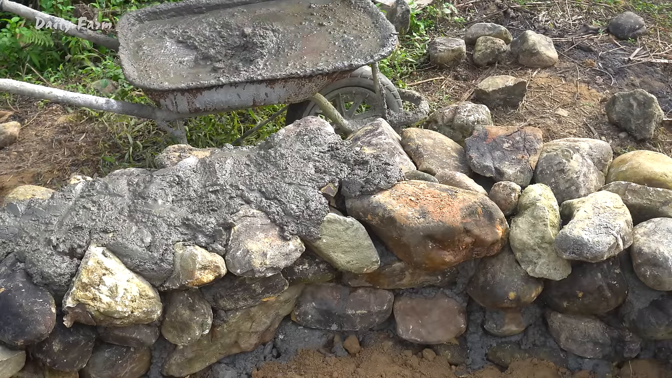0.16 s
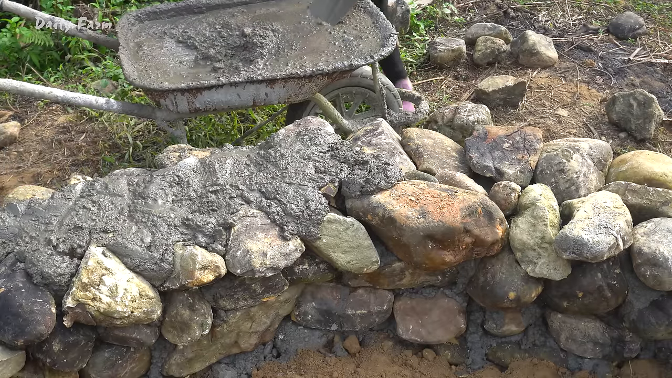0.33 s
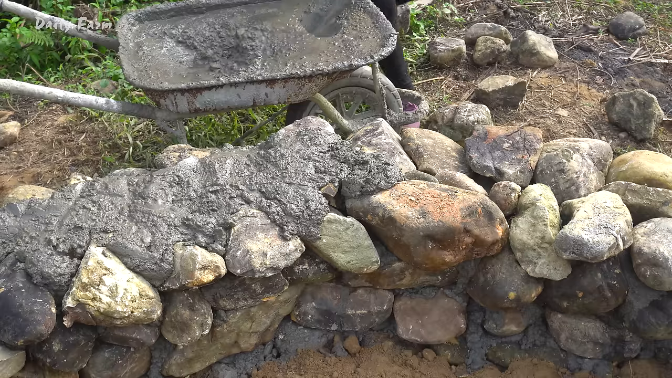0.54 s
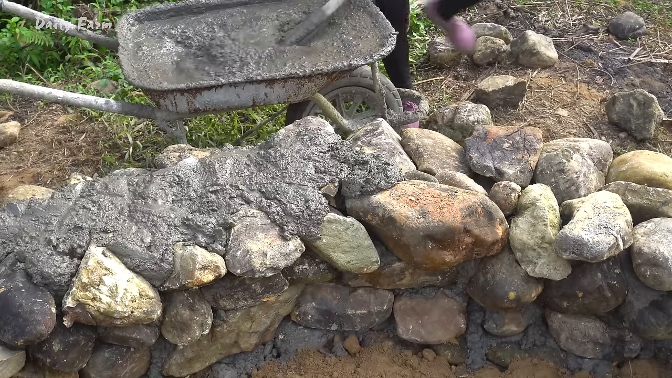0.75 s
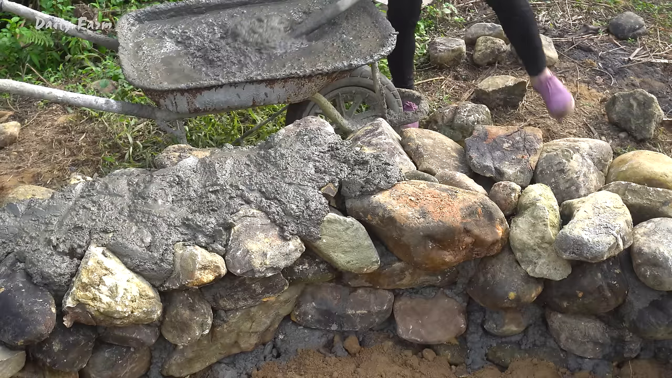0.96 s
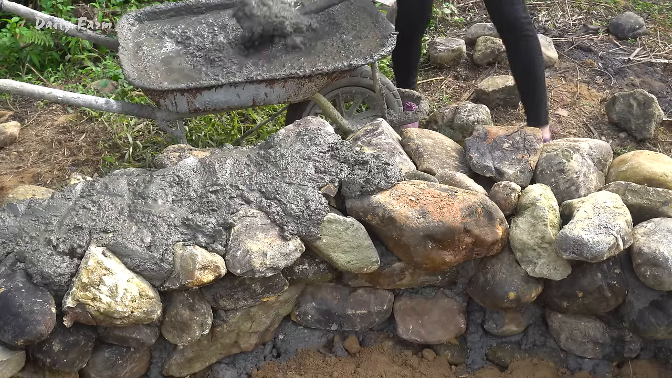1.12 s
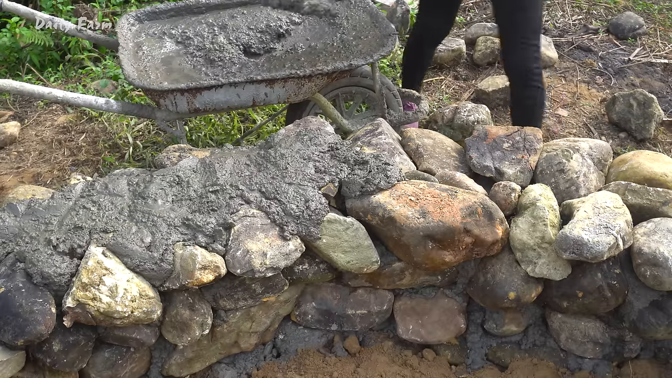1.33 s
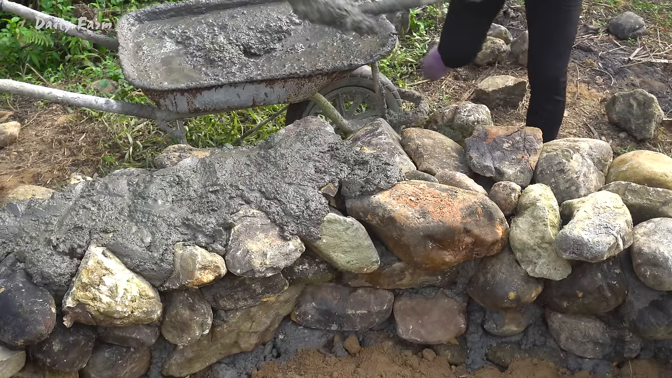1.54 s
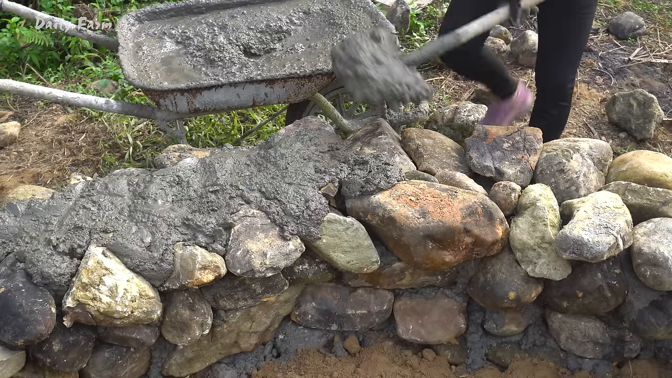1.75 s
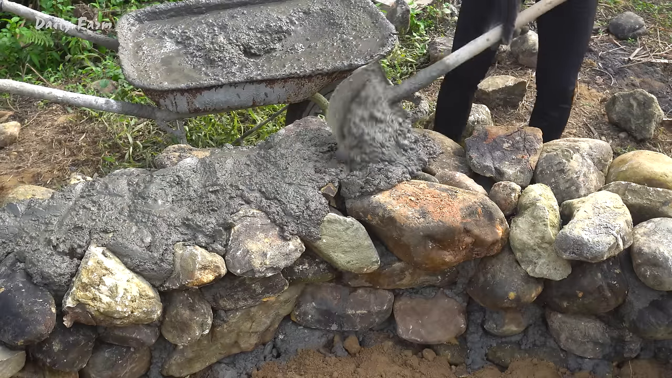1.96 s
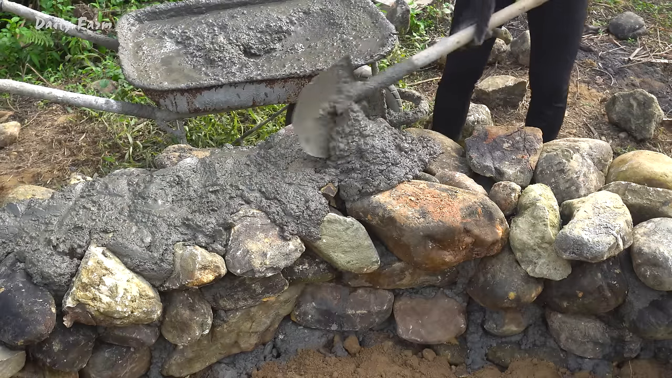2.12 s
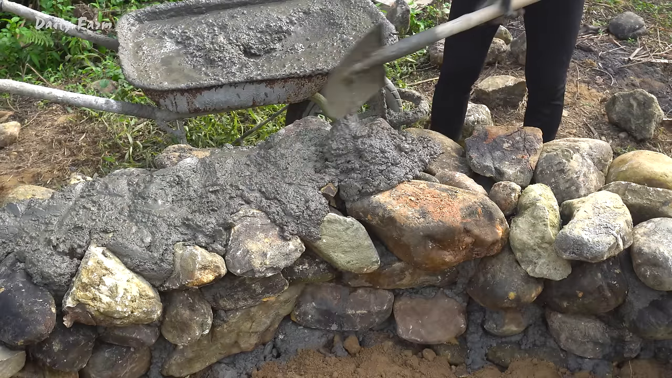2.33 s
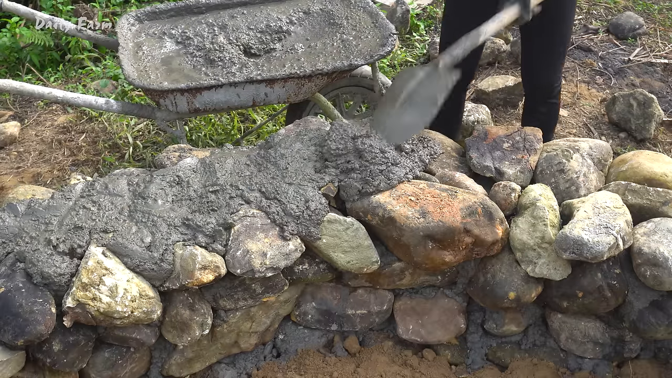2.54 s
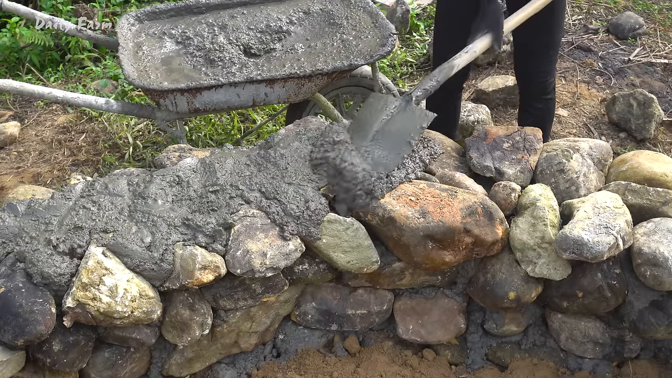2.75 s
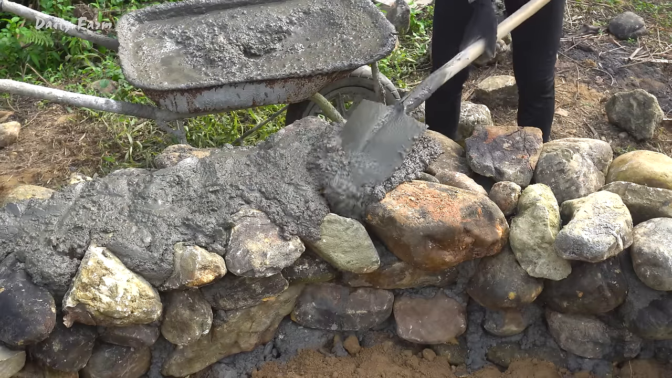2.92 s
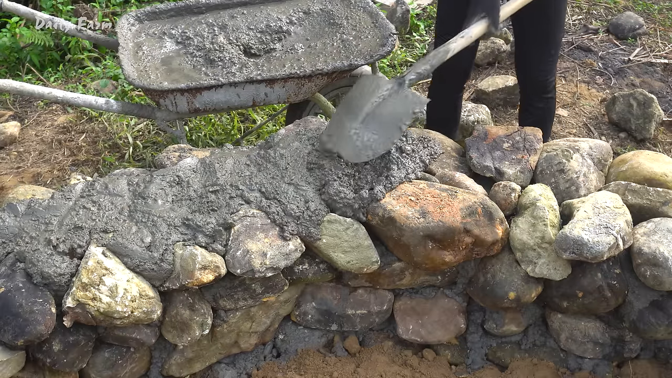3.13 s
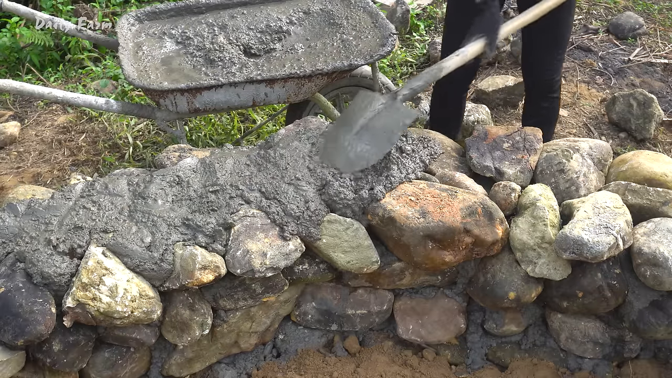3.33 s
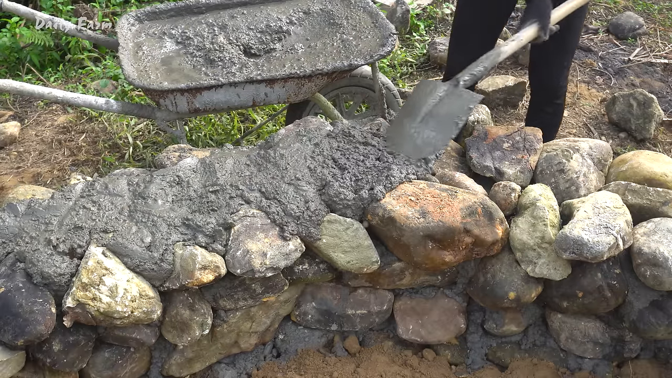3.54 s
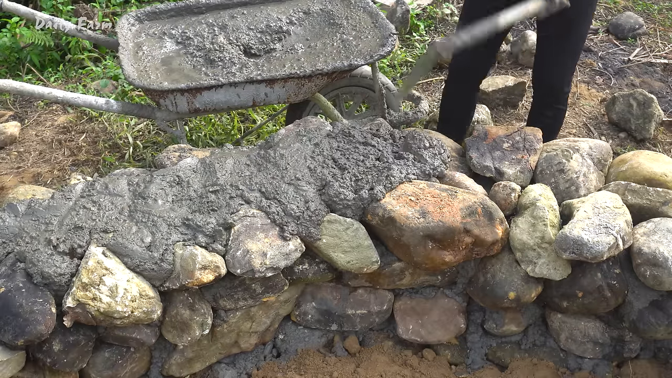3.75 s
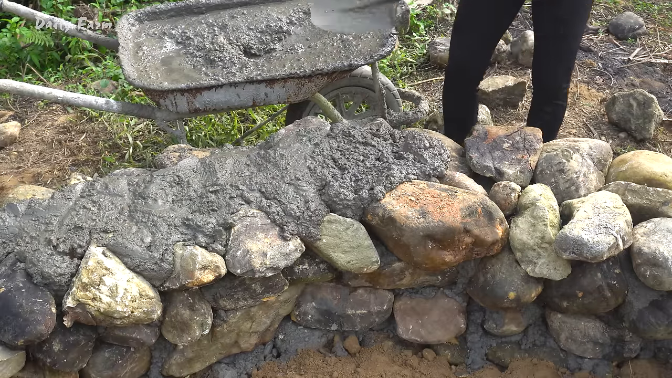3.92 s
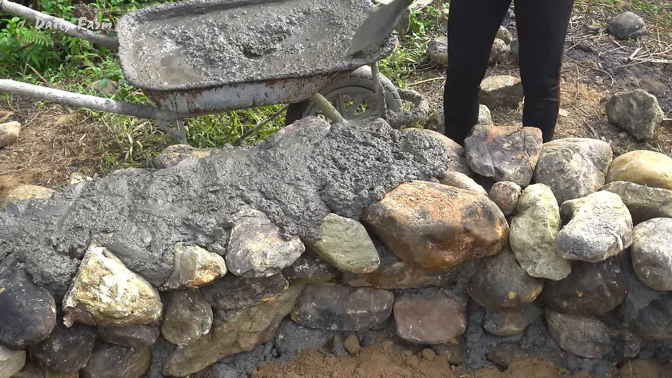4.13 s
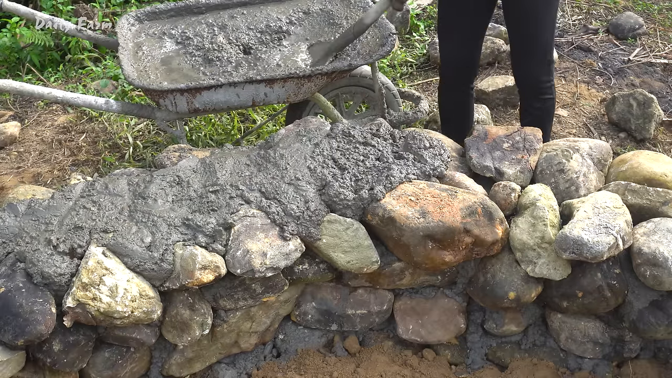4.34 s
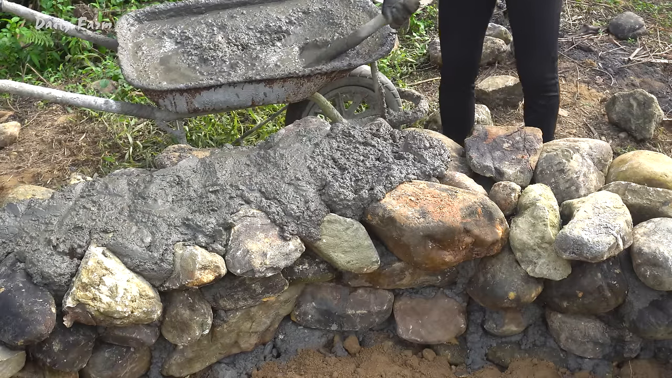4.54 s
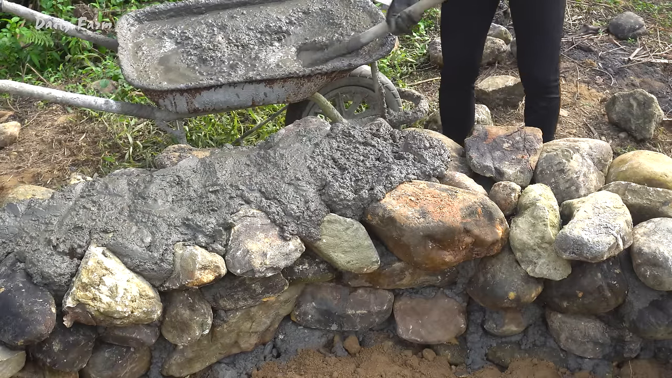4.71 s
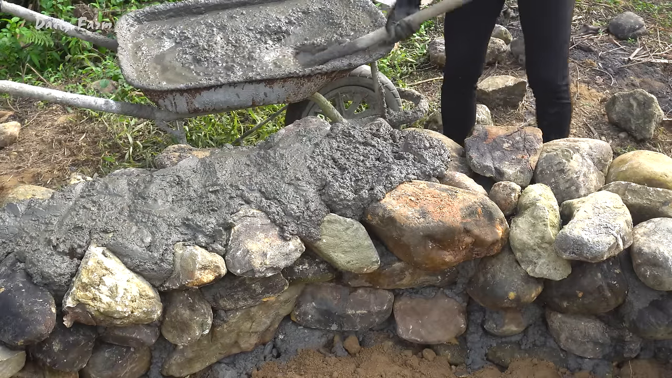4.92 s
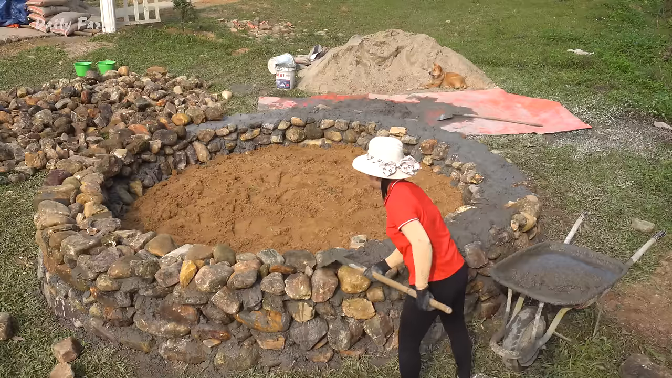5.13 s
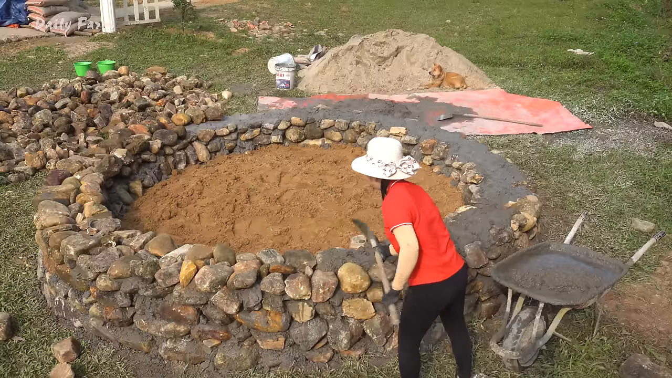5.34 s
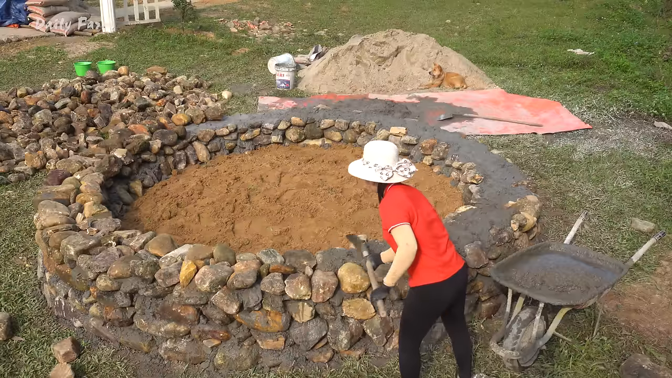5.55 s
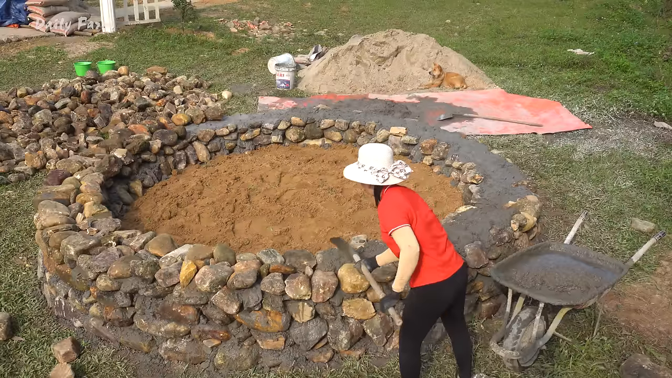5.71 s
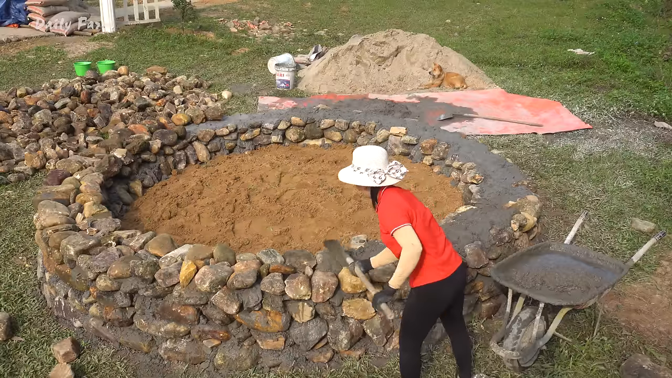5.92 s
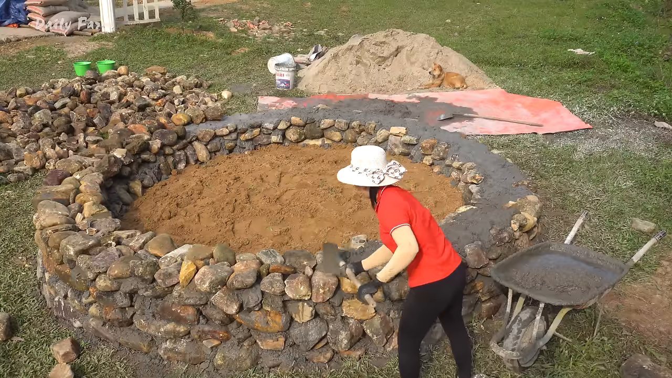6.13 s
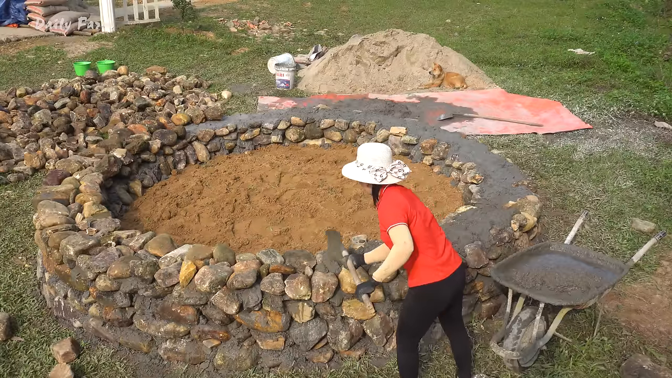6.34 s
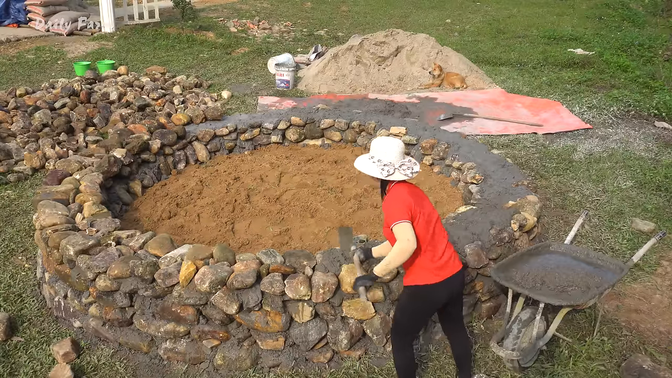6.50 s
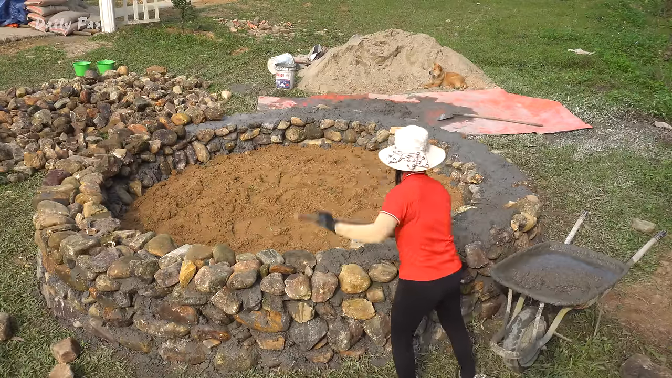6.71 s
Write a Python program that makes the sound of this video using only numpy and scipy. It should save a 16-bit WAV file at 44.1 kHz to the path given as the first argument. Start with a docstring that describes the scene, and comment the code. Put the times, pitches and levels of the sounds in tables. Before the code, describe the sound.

Close up outdoors, a steel shovel digs into wet, sandy mortar in a wheelbarrow, drops the load on a stone wall and spreads it with gritty rasps, crunches and short damped knocks. It digs in again with a sharp clack. After about five seconds the perspective steps back, with more low rumble and a faint hum, and a small trowel makes short, sharper scrapes. Birds chirp and insects buzz quietly throughout.

```python
"""Outdoors, close to a wheelbarrow of wet mortar: a steel shovel scoops, drops its load on a stone wall,
spreads it and digs in again; crackling sand grains drive the resonances of barrow and blade, and stones knock.
From about 5.3 s the place is further back from the wall: more rumble and a low hum. A hand trowel then cuts
and scrapes mortar between the stones, with sharper resonances. Around the work, birds call as gliding tones,
insects buzz as narrow noise and a pulsing tone, and shaped noise makes the air and a faint far rumble."""
import sys
import numpy as np
from scipy import signal
from scipy.fft import rfft, irfft, next_fast_len
from scipy.io import wavfile

SR = 44100
rng = np.random.default_rng(int(sys.argv[2]) if len(sys.argv) > 2 else 0)


def to_wav(sig):
    """Store sig (one row per channel, or 1-D mono) as 16-bit WAV at the path in sys.argv[1].

    Samples outside -1..1 are clipped; the rate is SR.
    """
    pcm = np.clip(np.atleast_2d(sig), -1, 1) * 32767
    pcm = np.round(pcm).astype(np.int16)
    wavfile.write(sys.argv[1], SR, pcm.T)  # frames by channels


N = 302958
T = np.arange(N) / SR  # seconds
STEP_BACK_S, STEP_BACK_TAKES_S = 5.27, 0.38  # middle and length of the move away from the wall


# Shovel strokes: scooping, carrying, the load sliding onto the wall, chopping and spreading, digging in again.
# Each row: start, push, hold and time to fade 20 dB in seconds, then hollow body, blade rasp and
# fine sand hiss in dB before the mix, blade resonance in Hz.
SHOVEL_STROKES = [(0.316, 0.054, 0.28, 0.22, -45.5, -34, -35, 2870),
                  (0.895, .04, 0.069, .25, -52, -47, -57.5, 3560),
                  (1.156, 0.026, 0.13, .14, -74, -60.5, -57.5, 3660),
                  (1.754, 0.083, 0.059, 2, -59.5, -53.5, -54, 3370),
                  (1.875, 0.078, 0.017, 0.13, -42, -37.5, -37, 3050),
                  (2.04, 0.041, 0.077, 0.16, -50, -36.5, -39, 3100),
                  (2.163, 0.088, .12, 0.16, -60, -40, -45.5, 2600),
                  (2.602, 0.014, 0.059, 0.21, -43, -32, -34, 2780),
                  (2.721, 0.014, 0.034, 0.13, -43, -48, -49, 2500),
                  (2.863, 0.039, 0.059, 0.04, -47.5, -44.5, -47, 2850),
                  (2.972, 0.054, 0.053, 0.05, -56, -43, -45.5, 3300),
                  (3.334, 0.0072, 0.0078, 0.1358, -40, -28.5, -32, 2670),
                  (3.375, 0.096, 0.026, 0.1754, -42.5, -36.5, -39.5, 2520),
                  (3.577, 0.038, 0.095, 0.11, -58.5, -48.5, -53, 2940),
                  (3.804, 0.046, 0.068, .25, -78.5, -56, -60, 3100),
                  (4.175, 0.011, 0.0075, 0.027, -41.5, -25.5, -25, 3220),
                  (4.201, 0.052, 0.027, 0.183, -36.5, -30.5, -28, 3220),
                  (4.393, 0.089, 0.092, 0.23, -48, -49, -44.5, 2700),
                  (4.725, 0.081, 0.061, 0.56, -44, -48, -50.5, 2340),
                  (4.948, 0.017, 0.0038, 0.06, -51, -42.5, -41, 2540),
                  (5.039, .07, 0.053, 0.09, -48, -40, -41, 2950),
                  (5.325, 0.0355, 0.048, 0.1, -58, -79, -58.5, 2450)]
# Coarse grit crushed under the shovel's edge. Each row: time in seconds, hollow body, blade rasp and
# fine sand hiss in dB before a common lift, t60 in seconds.
SHOVEL_CRUNCHES = [(0.32, -65, -33, -39, 0.045), (0.645, -39, -26, -21.5, 0.01),
                   (1.211, -62.5, -53, -39.5, 0.034), (1.378, -52, -38, -26.5, 0.0049),
                   (1.935, -45.5, -23.5, -19.5, 0.029), (2.596, -58.5, -22, -34, 0.046),
                   (2.652, -25.5, -19, -25.5, 0.016), (2.857, -24.5, -33, -33, 0.023),
                   (3.481, -35, -44, -27, 0.026), (4.255, -23, -21, -24.5, 0.026),
                   (4.891, -45, -28.5, -28.5, 0.032), (4.967, -50, -34, -34, 0.023),
                   (4.977, -43, -32.5, -28.5, 0.05), (5.011, -35, -32.5, -37, 0.045),
                   (5.118, -31.5, -24.5, -31, 0.037), (5.146, -50.5, -51, -26.5, 0.024)]
# Broad resonances of the hollow sound. Each row: centre in Hz, width in Hz, relative level in dB.
SHOVEL_BODY = [(180, 84, -18.5), (380, 250, -8), (695, 211, 4.5), (895, 470, -16.5), (1237, 194, 2.5),
               (1750, 470, -5)]
# Broad resonances of the rasping blade. Each row: centre in Hz, width in Hz, relative level in dB.
SHOVEL_BLADE = [(2066, 380, 3.5), (2596, 330, 1.5), (2850, 2200, 0), (3340, 570, 0), (3840, 180, 0)]
# High resonances of the shovel's edge. Each row: centre in Hz, width in Hz, relative level in dB.
SHOVEL_EDGE = [(4770, 1350, 2), (4720, 930, 8.5), (5450, 610, -2.5), (5900, 810, 5)]
# Colour of the sand's hiss. Each row: frequency in Hz, relative density in dB per Hz.
SAND_HISS = [(3000, 5), (5500, -35), (7000, 6), (9000, 6.5), (12000, 4.5), (16000, 3)]


def shovel(glide_share=0.34, glide_width_hz=450):
    """Sand drives the barrow and blade; one blade resonance moves as the load shifts."""
    body, blade, hiss = friction(SHOVEL_STROKES, SHOVEL_CRUNCHES, crunch_db=2.5, rise=0.033)
    coarse = sand(per_s=3500, size_db=3.0, smooth_db=-1.5, judder_db=1.5, judder_rate=130)
    fine = sand(per_s=7000, size_db=5.0, smooth_db=1.5, judder_db=1.5, judder_rate=170)
    share = np.clip(glide_share, 0, 1)
    hollow = resonate(body * coarse, SHOVEL_BODY, 166, 1700, wander_db=2.0)
    rasp = np.sqrt(1 - share) * resonate(blade * coarse, SHOVEL_BLADE, 1660, 4960, wander_db=4.0)
    sing = np.sqrt(share) * gliding(blade * fine, blade_pitch(), glide_width_hz)
    # the edge's high resonances wake only when fine sand grinds as well
    edge = resonate(np.sqrt(blade * hiss) * fine, SHOVEL_EDGE, 3670, 9550, wander_db=5.0)
    steel = from_db(-3) * hollow + from_db(-2.5) * (rasp + sing) + from_db(-6.5) * edge
    return steel + from_db(0.5) * spray(hiss, fine, SAND_HISS, side_db=-18) + crackle(hiss)


def blade_pitch(wander=0.081, wander_rate=22):
    """The strongest stroke dominates the blade's resonance, which wanders as the load shifts."""
    weights = np.array([stroke(*row[:4]) * from_db(row[5]) for row in SHOVEL_STROKES]) + 1e-9
    resonance_hz = np.array(SHOVEL_STROKES)[:, 7]
    return resonance_hz @ weights / weights.sum(axis=0) * np.exp(wander * drift(wander_rate))


# Colour of the bursting grains. Each row: frequency in Hz, relative density in dB per Hz.
CRACKLE = [(1500, -18), (4000, -7), (9000, 1.5), (16000, 2)]


def crackle(force, per_s=70, db=-60, ring_s=0.00045):
    """Now and then a larger grain bursts; these stand out most when the blade presses lightly."""
    pops = (rng.random(N) < per_s / SR) * rng.uniform(0.55, 1, N) ** 2
    decaying = signal.lfilter([1], [1, -np.exp(-1 / (ring_s * SR))], pops + 1e-18)
    bursts = decaying * rng.standard_normal(N)
    return from_db(db) * rms_one(coloured(bursts * np.sqrt(force), CRACKLE))


# Trowel strokes. Each row: start, push, hold and time to fade 20 dB in seconds, then hollow body,
# blade rasp and fine sand hiss in dB before the mix.
TROWEL_STROKES = [(5.535, 0.012, 0.043, 0.2, -47, -39.5, -41.5),
                  (5.74, 0.085, 0.031, 0.25, -55, -51.5, -51.5),
                  (5.893, 0.0061, 0.044, 0.08, -52, -41.5, -41),
                  (6.192, 0.015, 0.0082, .036, -35, -22, -26.5),
                  (6.243, 0.0072, .025, .055, -51.5, -36, -39.5),
                  (6.446, 0.01, 0.0059, 0.0021, -29, -18.5, -26),
                  (6.462, 0.013, 0.01, 0.3, -48, -42.5, -47), (6.52, 0.031, 0.011, -0.44, -64, -45.5, -40)]
# Grit crushed under the trowel's edge. Each row: time in seconds, hollow body, blade rasp and
# fine sand hiss in dB before a common lift, t60 in seconds.
TROWEL_CRUNCHES = [(5.549, -32.5, -26, -47, 0.059), (5.897, -60, -27.5, -25.5, 0.015),
                   (5.908, -40, -33, -26, 0.02), (5.947, -55, -37, -24.5, 0.014),
                   (6.25, -50, -26, -24, 0.022)]
# Hollow resonances under the trowel. Each row: centre in Hz, width in Hz, relative level in dB.
TROWEL_BODY = [(570, 90, -15), (775, 93, 15.5), (913, 95, 8.5), (1080, 142, 3), (1320, 530, 3)]
# Resonances of the trowel's blade. Each row: centre in Hz, width in Hz, relative level in dB.
TROWEL_BLADE = [(1880, 90, -21), (2250, 31, 9), (2400, 80, 10.5), (2640, 120, 3.5), (2870, 300, 5),
                (3250, 340, 9), (3890, 460, 5), (4500, 340, 1.5), (4720, 200, 7), (5450, 240, -3),
                (6000, 3300, -5.5)]


def trowel():
    """A small thin blade: finer crackle and sharper resonances."""
    body, blade, hiss = friction(TROWEL_STROKES, TROWEL_CRUNCHES, crunch_db=3.5, rise=.06)
    grains = sand(per_s=7400, size_db=4.0, smooth_db=-4.5, judder_db=3.2, judder_rate=290)
    # relative density of the hiss: (Hz, dB per Hz)
    hiss_spectrum = [(3000, -35), (5500, 8), (7000, 16.5), (9000, 16.0), (12000, 11.5), (16000, 10.0)]
    hollow = resonate(body * grains, TROWEL_BODY, 320, 3300, wander_db=3.5)
    rasp = resonate(blade * grains, TROWEL_BLADE, 1700, 8500, wander_db=1.4)
    return from_db(-1.5) * (hollow + rasp) + spray(hiss, grains, hiss_spectrum, side_db=-14)


# The blade catches and one resonance rasps out. Each row: loudest moment in seconds, half length in seconds,
# central pitch in Hz, level in dB before the mix.
CATCHES = [(0.442, .0097, 3426, -34), (0.649, .027, 1292, -34), (0.692, 0.0099, 2490, -36.5),
           (2.137, .058, 1318, -47), (2.26, 0.032, 2570, -42.5), (2.747, .018, 950, -40.5),
           (3.125, .011, 2690, -46), (3.391, 0.028, 2011, -39), (5.13, .025, 3300, -40.5),
           (5.581, .025, 2172, -46), (6.212, .01, 2350, -30.5), (6.461, 0.00803, 2400, -23.5)]
CATCH_STRAY_HZ = 139.7  # unsteadiness of a catch's pitch


def catches(chatter_db=5.5, chatter_rate=260):
    """Stick and slip feed one resonance: a short, rough tone of unsteady pitch."""
    out, stray = np.zeros(N), drift(500)
    chatter = rms_one(from_db(chatter_db * drift(chatter_rate)))
    for s, half, hz, db in CATCHES:
        near = np.abs(T - s) < 3 * half
        phase = 2 * np.pi * np.cumsum(hz + CATCH_STRAY_HZ * stray[near]) / SR
        swell = from_db(db) * np.exp(-((T[near] - s) / half) ** 2)
        out[near] += swell * chatter[near] * np.sqrt(2) * np.sin(phase)
    return out


# The shovel knocks on stones and the barrow. Each row: time in seconds, peak in dB before the bass cut and mix,
# centre of the excited modes in Hz, their spread in octaves, ring t60 in seconds.
KNOCKS = [(0.082, -38, 704, 0.59, 0.026), (0.879, -32, 1130, 0.19, 0.029), (0.880, -25, 2730, 0.096, 0.013),
          (1.935, -24, 560, 0.26, 0.022), (2.791, -15.5, 950, 0.53, 0.031), (2.825, -27, 880, 0.22, 0.014),
          (2.832, -29, 1100, 0.56, 0.045), (2.858, -21.5, 1360, 0.35, 0.027),
          (2.864, -27, 915, 0.17, 0.046), (2.926, -30.5, 870, 0.18, 0.042), (4.272, -5, 2610, 1.15, 0.004),
          (4.273, -12, 1255, 0.17, 0.025), (4.892, -22.5, 1840, 0.11, 0.046)]
# Ringing modes of the mortar-laden shovel. Each row: frequency in Hz, usual relative level in dB.
SHOVEL_MODES = [(340, -10), (520, -2), (690, -0.5), (880, -5), (1157, -4), (1380, -6), (1570, 9), (1770, 1),
                (2130, 8), (2700, 10.5), (3050, 12.5), (3390, 14), (4156, 7), (5184, 7), (5860, -17.5)]


def knocks():
    """Each contact wakes the modes near its own pitch; wet mortar damps them fast, and the knocks carry no
    bass."""
    out, age = np.zeros(N), T[:SR // 4]
    hz, mode_db = np.transpose(SHOVEL_MODES)
    for s, db, centre, spread, t60 in KNOCKS:
        excited = np.exp(-.5 * (np.log2(hz / centre) / spread) ** 2)
        strength = from_db(mode_db + rng.standard_normal(len(hz))) * excited
        signed = strength * rng.choice([-1, 1], len(hz))
        ring = signed @ np.sin(2 * np.pi * hz[:, None] * age) * from_db(-60 * age / t60)
        i = int(s * SR)
        out[i:i + len(age)] += from_db(db) * ring / np.abs(ring).max()
    return signal.sosfilt(signal.butter(2, 300, "high", fs=SR, output="sos"), out + 1e-18)


SAG_DB_PER_S = 15.5  # a stroke loses force while it is held
BODY_FOLLOWS, HISS_FOLLOWS = 0.97, 1.144  # dB per dB of force: the hollow sound lingers, the hiss stops first
UNEVEN_DB, UNEVEN_PER_S = 0.88, 45  # lumps in the mortar vary the force
LOAD_DB_PER_S = 31.5  # the hollow sound grows during the hold, as the blade fills


def friction(strokes, crunches, crunch_db, rise):
    """Force on body, blade and fine sand: uneven strokes plus sudden crunches that die away."""
    power, follows = np.zeros((3, N)), np.array([[BODY_FOLLOWS], [1], [HISS_FOLLOWS]])
    for start, push, hold, fade, body_db, blade_db, hiss_db, *_ in strokes:
        levels = from_db([[body_db], [blade_db], [hiss_db]])
        force = levels * stroke(start, push, hold, fade) ** follows
        force[0] *= from_db(LOAD_DB_PER_S * np.clip(T - start - push, 0, hold))
        power += force ** 2
    power *= from_db(UNEVEN_DB * drift(UNEVEN_PER_S)) ** 2
    age = T[:SR // 4]
    for s, body_db, blade_db, hiss_db, t60 in crunches:
        burst = (1 - np.exp(-age / (rise * t60))) * from_db(crunch_db - 60 * age / t60)
        levels = from_db([[body_db], [blade_db], [hiss_db]])
        i = int(s * SR)
        power[:, i:i + len(age)] += (levels * burst)[:, :N - i] ** 2
    return np.sqrt(power)


def stroke(start, push, hold, fade):
    """Force of one stroke: it builds evenly, sags while held, then dies away."""
    force = np.zeros(N)
    near = (T > start) & (T < start + push + hold + 3 * fade)
    held = T[near] - start - push
    sag_db = SAG_DB_PER_S * np.clip(held, 0, hold)
    fade_db = 20 * np.maximum(held - hold, 0) / fade
    force[near] = np.minimum(1 + held / push, 1) * from_db(-sag_db - fade_db)
    return force


def sand(per_s, size_db, smooth_db, judder_db, judder_rate):
    """Grains of uneven size crack over a smooth rub while the blade sticks and slips."""
    sizes = from_db(size_db * np.minimum(rng.exponential(1, N), 4.5)) * rng.choice([-1, 1], N)
    grains = rms_one(sizes * (rng.random(N) < per_s / SR))
    rub = from_db(smooth_db) * rng.standard_normal(N)
    return rms_one((grains + rub) * from_db(judder_db * drift(judder_rate)))


def spray(force, grains, spectrum, side_db):
    """Fine sand cracks all along the edge, so the two ears hear partly different grains."""
    side = from_db(side_db) * sand(per_s=6000, size_db=3.5, smooth_db=-3, judder_db=1.0, judder_rate=300)
    return coloured(force * (grains + side * [[1], [-1]]), spectrum)


# One bird's falling chirp. Each row: seconds after its start, pitch in Hz before a slight waver, relative level in dB.
CHIRP = [(0, 7260, -11), (.007, 7950, 1.5), (0.018, 7850, -5.5), (.026, 5500, -3), (0.03, 3750, 2.5),
         (.036, 3560, -4.5), (.048, 3780, 5), (.064, 3380, -8), (.08, 3050, -17), (.115, 2740, -12.5)]
# When that bird calls. Each row: start in seconds, level in dB, added to the chirp's own.
CHIRPS = [(0.099, -52.5), (0.724, -49), (1.022, -50), (1.321, -48.5), (1.626, -49)]
# Whistled notes of other birds. Each row: start in seconds, length in seconds, first and last pitch in Hz
# before the waver, level in dB before a common uneven trim.
WHISTLES = [(-.15, 0.4, 5278, 5250, -54), (.78, 0.31, 3770, 4120, -50), (1.178, .31, 4140, 4404, -49),
            (1.43, 0.13, 3865, 3910, -50.5), (1.565, 0.226, 3830, 3980, -50),
            (4.629, 0.058, 3240, 3450, -40), (4.685, .15, 3550, 2410, -49.5)]
WHISTLE_WAVER = 0.012  # share of the pitch


def birds():
    """One bird repeats a falling chirp, others whistle unevenly."""
    chirps = sum(note([(s + t, hz, db + level) for t, hz, level in CHIRP]) for s, db in CHIRPS)
    whistles = sum(whistle(*row) for row in WHISTLES)
    return chirps + whistles * from_db(2.5 * drift(40) - 4.5)


def whistle(start, length, first_hz, last_hz, db, swell_db=13):
    """A note that slides to its pitch while it swells, then holds it and fades."""
    middle, end = start + length / 2, start + length
    rows = [(start, first_hz, db - swell_db), (middle, last_hz, db), (end, last_hz, db - swell_db)]
    return note(rows, waver=WHISTLE_WAVER)


def note(rows, waver=0.0032):
    """A near-pure tone along a pitch and level curve."""
    hz, db = in_time(rows)
    phase = 2 * np.pi * np.cumsum(hz * (1 + waver * drift(120))) / SR
    return np.sqrt(2) * from_db(db) * during(rows, fade=0.0066) * np.sin(phase)


# The far insect chorus. Each row: centre in Hz, nominal width in Hz before the filters set it, level in dB.
CHORUS = [(5152, 620, -62), (7520, 490, -66)]
# One nearer insect. Each row: time in seconds, level in dB.
INSECT = [(0, -69), (3.2, -62.5), (3.8, -61), (5.5, -61), (6.0, -76), (6.87, -62)]
INSECT_HZ = 4930  # centre of its unsteady pitch


def insects(pulses_per_s=20, sweep_hz=130):
    """A far chorus hisses; a nearer insect pulses, each pulse rising slightly."""
    chorus = 0
    for hz, width, db in CHORUS:
        band = resonance(hz, width * 1.2)
        once = signal.lfilter(*band, wide_noise(side_db=0.5))
        chorus = chorus + from_db(db) * rms_one(signal.lfilter(*band, once))
    db, = in_time(INSECT)
    cycle = np.cumsum(pulses_per_s * (1 + .16 * drift(14))) / SR % 1
    pitch = INSECT_HZ + sweep_hz * (2 * cycle - 1) + 110 * drift(400) + 50 * drift(4)
    pulse = np.sin(np.pi * cycle) ** 2 * from_db(2.04 * drift(130) + 0.98 * drift(12))
    return chorus + from_db(db) * rms_one(pulse * np.sin(2 * np.pi * np.cumsum(pitch) / SR))


HUM_HZ, HUM_DB, HUM_SWELL_S = 107, -63, 0.81  # mean pitch, middle level, seconds to swell in


def far_hum(waver=0.029, flutter_db=-2.0):
    """A low, distant, wavering hum that swells in, heard only further back."""
    phase = 2 * np.pi * np.cumsum(HUM_HZ * (1 + waver * drift(120))) / SR
    swell = np.clip((T - STEP_BACK_S) / HUM_SWELL_S, 0, 1)
    return swell * from_db(HUM_DB + flutter_db * drift(12)) * np.sqrt(2) * np.sin(phase)


# Colour of the far rumble. Each row: frequency in Hz, relative density in dB per Hz.
RUMBLE = [(12, -78), (20, -55), (35, -16), (54, -3), (81, -3), (113, -0.5), (216, -12), (250, -20),
          (320, -30), (550, -120)]
# Colour of the soft air. Each row: frequency in Hz, relative density in dB per Hz.
AIR = [(120, -4.5), (200, -6), (403, -6.5), (637, -8.5), (679, -10.5), (844, -9), (1240, -11), (1550, -12),
       (4200, -14.5), (5460, -62), (9240, -120)]
# Outdoor background, first beside the barrow, then further back from the wall.
# Each row: rumble in dB, air in dB, high hiss in dB.
BACKGROUND = [(-67, -57.5, -58.5), (-59, -56, -63)]


def open_air():
    """Far rumble, soft air and a thin high hiss, each shaped from wide noise."""
    close, back = BACKGROUND
    leave, arrive = STEP_BACK_S - STEP_BACK_TAKES_S / 2, STEP_BACK_S + STEP_BACK_TAKES_S / 2
    rumble, air, hiss = from_db(in_time([(leave, *close), (arrive, *back)]))
    # relative density of the hiss: (Hz, dB per Hz)
    high = [(2500, -41), (4500, 10.0), (7000, 1.5), (10000, -0.5), (16000, -3.5)]
    out = rumble * coloured(wide_noise(side_db=-28), RUMBLE)
    out = out + air * coloured(wide_noise(side_db=-1.5), AIR)
    return out + hiss * coloured(wide_noise(side_db=0.0), high)


def scattered(x, t60, delay, top_hz):
    """Diffuse reflections, different at each ear."""
    age = T[:SR // 2]
    response = rng.standard_normal((2, len(age))) * from_db(-60 * age / t60) * (age > delay)
    response = signal.lfilter(*signal.butter(1, min(top_hz, .45 * SR), fs=SR), response)
    response = response / np.linalg.norm(response, axis=1, keepdims=True)
    return signal.oaconvolve(x[None], response, axes=1)[:, :N]


def wide_noise(side_db):
    """White stereo noise with a given width."""
    mid, side = rng.standard_normal((2, N))
    return rms_one(mid + from_db(side_db) * side * [[1], [-1]])


def coloured(x, spectrum):
    """Shape a sound by a spectrum, keeping the power of white noise."""
    hz, db = np.transpose(spectrum)
    size = next_fast_len(N)
    f = np.fft.rfftfreq(size, 1 / SR) + 1
    gain = from_db(np.interp(np.log(f), np.log(hz), db, left=-100))
    return irfft(rfft(x, size) * rms_one(gain), size)[..., :N]


def resonate(x, modes, low_hz, high_hz, wander_db, wander_rate=35):
    """Parallel resonances in a band, each swelling and fading as the contact moves; keeps white noise's power."""
    band = signal.butter(2, [low_hz, min(high_hz, .45 * SR)], "band", fs=SR, output="sos")
    click = signal.sosfilt(band, signal.unit_impulse(2 ** 12))
    x, out, response = signal.sosfilt(band, x + 1e-18), 0, 0
    for hz, width, db in modes:
        level = from_db(db + wander_db * drift(wander_rate))
        out = out + level * signal.lfilter(*resonance(hz, width), x + 1e-18)
        response = response + from_db(db) * signal.lfilter(*resonance(hz, width), click)
    return out / np.linalg.norm(response)


def gliding(x, hz, width, size=128):
    """A resonance whose centre moves, keeping the power of white noise."""
    out, state = np.zeros(N), np.zeros(2)
    for i in range(0, N, size):
        out[i:i + size], state = signal.lfilter(*resonance(hz[i], width), x[i:i + size] + 1e-18, zi=state)
    return out * np.sqrt(SR / (np.pi * width))


def resonance(hz, width):
    """Two-pole band-pass with gain 1 on top."""
    r = np.exp(-np.pi * width / SR)
    return (1 - r * r) / 2 * np.array([1, 0, -1]), [1, -2 * r * np.cos(2 * np.pi * hz / SR), r * r]


def drift(rate):
    """Smooth chance of spread 1, changing rate times a second."""
    size = int(N / SR * 1000)
    return rms_one(np.interp(T * rate, np.arange(size), rng.standard_normal(size)))


def in_time(rows):
    """Each column of a curve at every sample."""
    s, *columns = np.transpose(rows)
    return [np.interp(T, s, c) for c in columns]


def during(rows, fade=0.0019):
    """1 between a curve's first and last row, with short fades outside."""
    return np.clip(np.minimum(T - rows[0][0], rows[-1][0] - T) / fade + 1, 0, 1)


def from_db(db):
    """Decibels to gain."""
    return 10 ** (np.asarray(db) / 20)


def rms_one(x):
    """Scale to rms 1."""
    return x / np.sqrt(np.mean(x ** 2) + 1e-20)


def scene():
    """The work is just right of centre among reflecting stones; the birds sit in the trees."""
    work, song = shovel() + trowel() + catches() + knocks(), birds()
    middle = work.mean(axis=0)
    stones = from_db(-15.5) * scattered(middle, t60=0.0053, delay=0.00035, top_hz=16200)
    yard = from_db(-24.5) * scattered(middle, t60=0.8, delay=0.011, top_hz=4120)
    trees = from_db(-4.5) * scattered(song, t60=0.51, delay=0.0027, top_hz=7000)
    foreground = work * from_db([[-1.0], [-.1]]) + stones + yard  # left and right gain in dB
    return foreground + from_db(-0.5) * song + trees + insects() + far_hum() + open_air()


CUTOFF_HZ = 15900


def record(dry):
    """The top is cut steeply."""
    return signal.sosfilt(signal.ellip(12, .1, 80, CUTOFF_HZ, fs=SR, output="sos"), dry)


dry = scene()
out = record(dry)
to_wav(out)
```